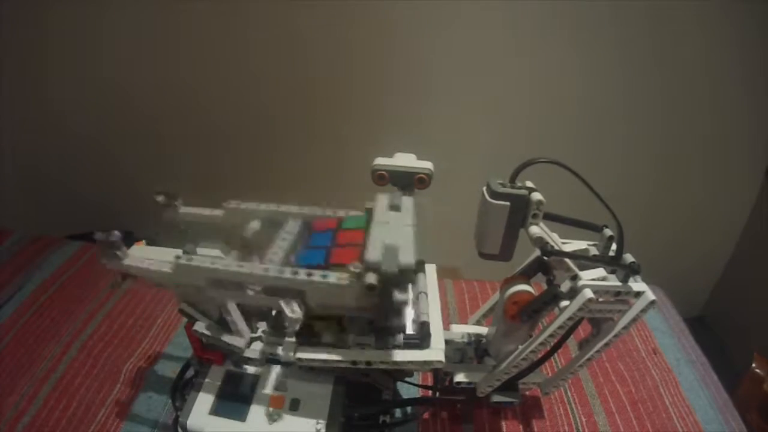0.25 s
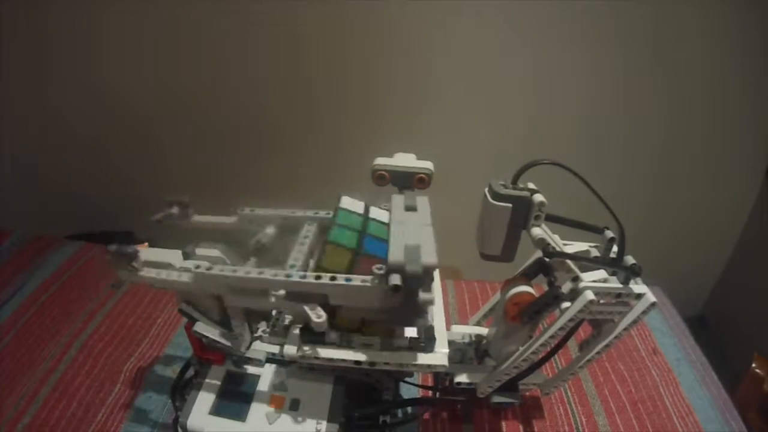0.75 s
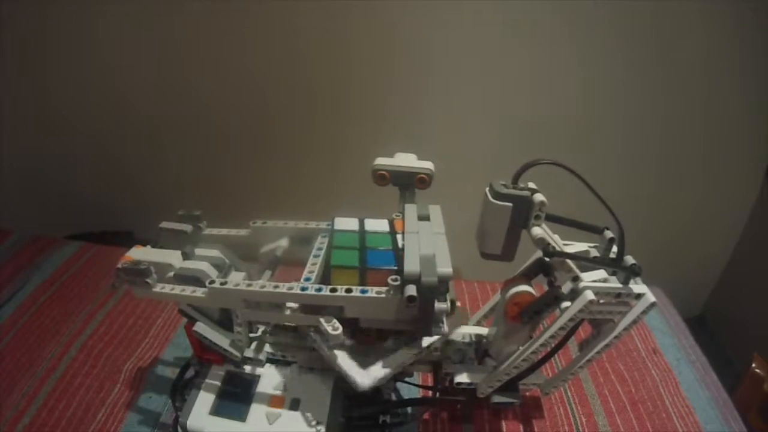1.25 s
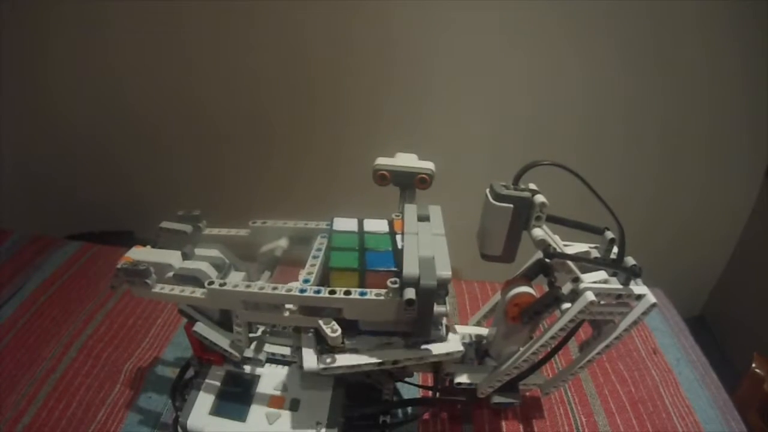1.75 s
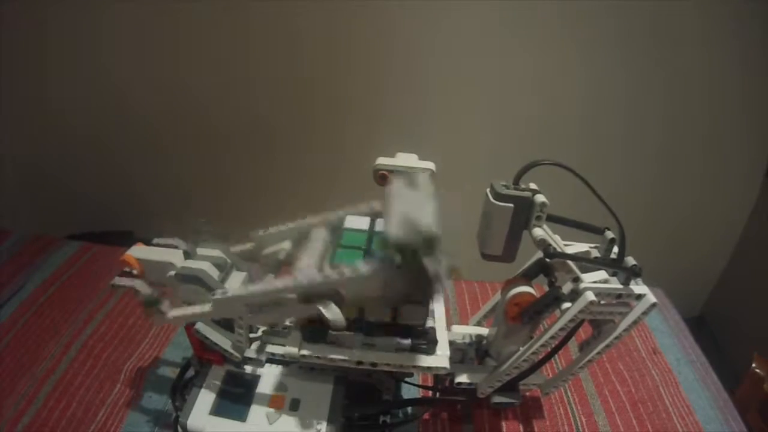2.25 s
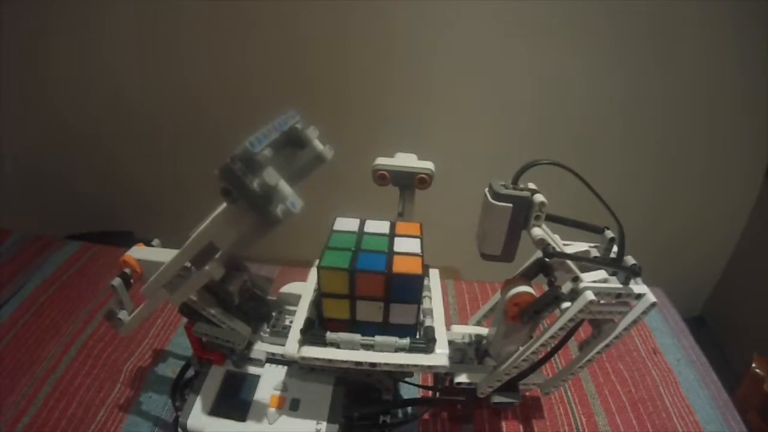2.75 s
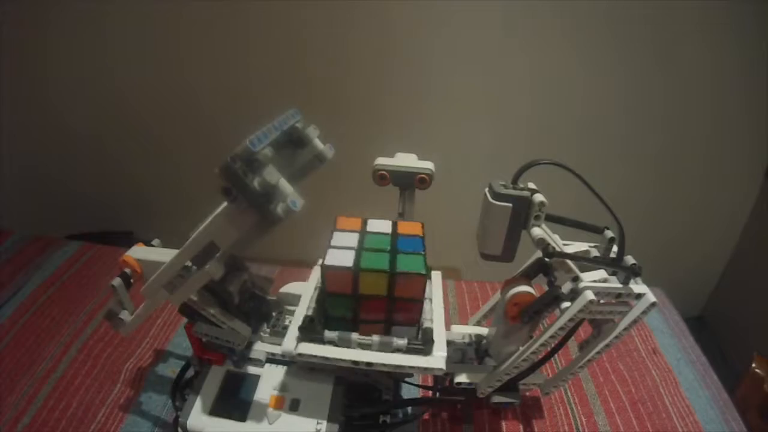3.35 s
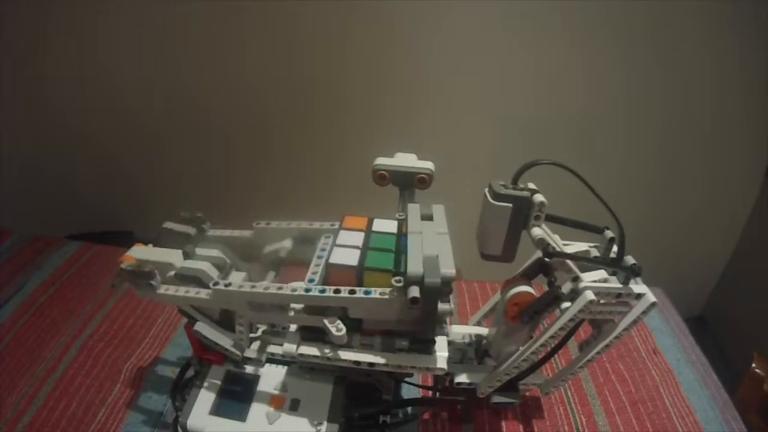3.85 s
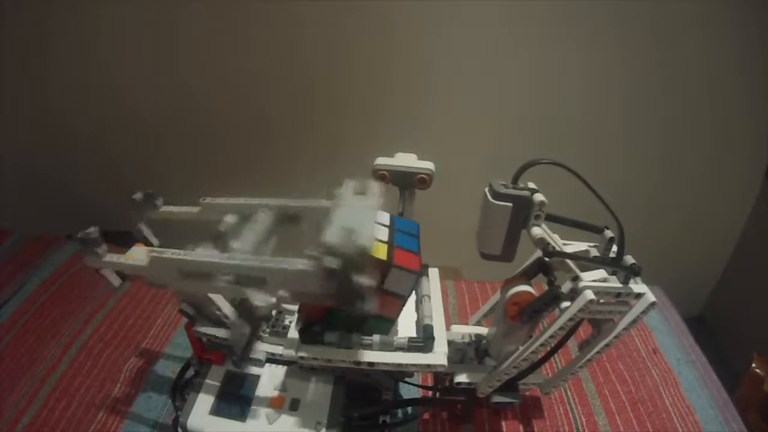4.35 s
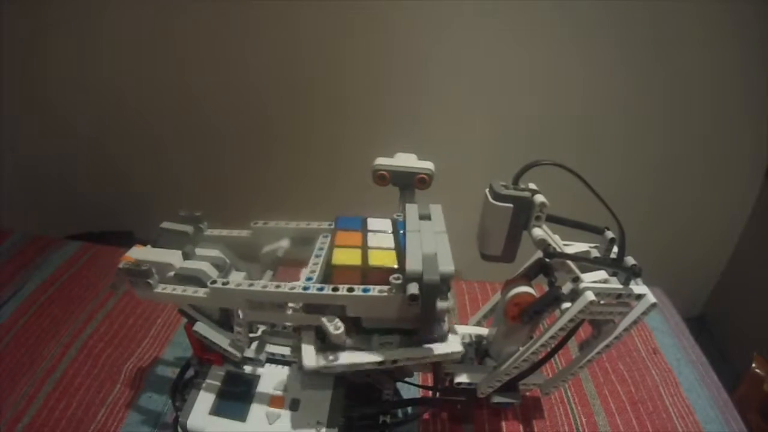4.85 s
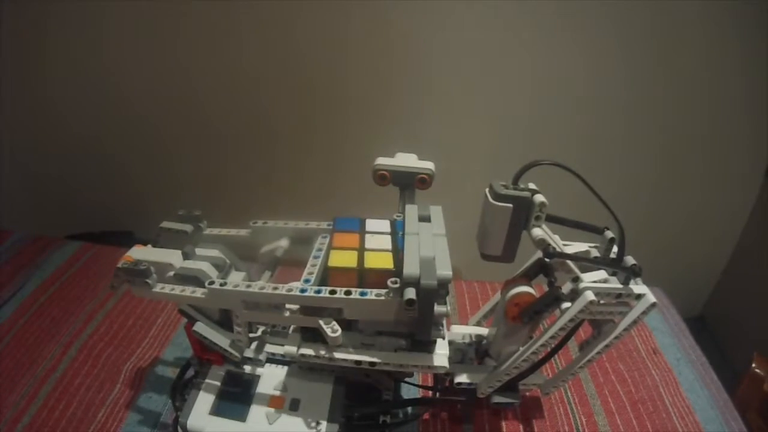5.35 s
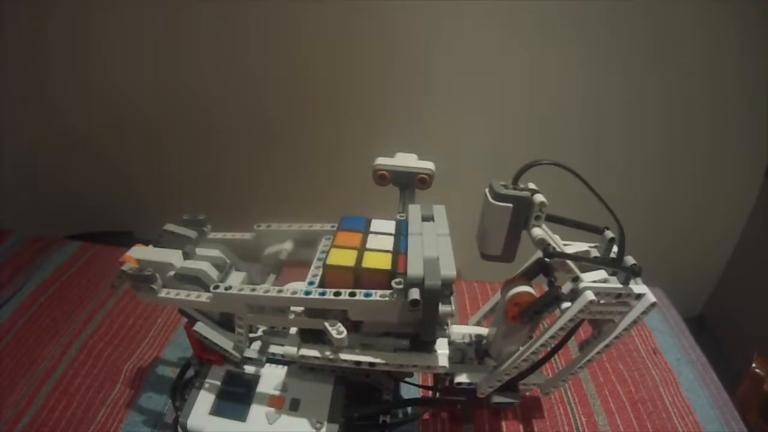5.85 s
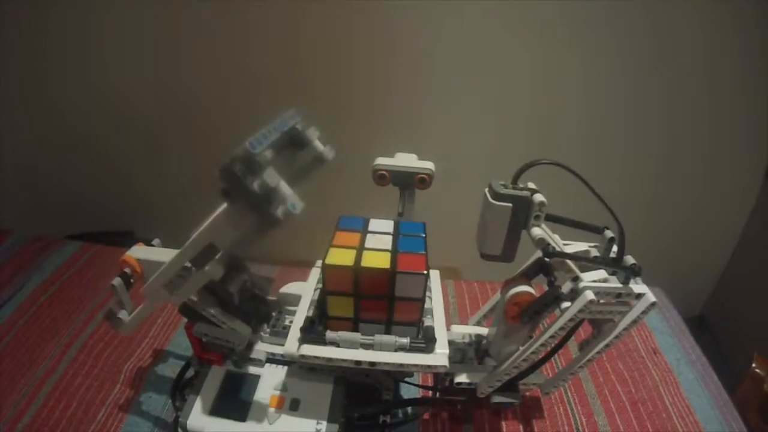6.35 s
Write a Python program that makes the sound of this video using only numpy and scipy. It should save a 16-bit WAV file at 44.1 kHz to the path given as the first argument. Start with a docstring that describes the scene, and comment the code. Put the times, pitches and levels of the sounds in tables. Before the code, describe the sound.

Stop-and-go servo whirring, hollow plastic clacks and dull frame thumps from a toy machine turning a puzzle cube, heard close indoors.

```python
"""A small room with a cloth-covered table: a toy robot of plastic beams flips and twists a puzzle cube.
Two geared servos (arm, turntable) rasp and whine: tooth harmonics and rattling grains through plastic modes.
The cube clacks against its cage and edges tick: damped sines and short noise bursts.
Drops thump the frame, which judders in its low modes, while the whole rig wobbles slowly on its support.
A short dense reverb holds motors and blows; a soft steady hiss lies underneath."""
import sys
import numpy as np
from scipy import signal
from scipy.fft import rfft, irfft
from scipy.io import wavfile

SR = 44100
rng = np.random.default_rng(int(sys.argv[2]) if len(sys.argv) > 2 else 0)


def store_pcm(level_fs):
    """Save levels as 16-bit WAV."""
    pcm = np.round(np.clip(level_fs, -1, 1) * 32767).astype(np.int16)
    wavfile.write(sys.argv[1], SR, np.atleast_2d(pcm).T)


N = 291501
TIME = np.arange(N) / SR  # s
FREQ = np.fft.rfftfreq(N, 1 / SR)  # Hz

ARM_RISE_S, ARM_T60_S, ARM_WAVER_DB = .028, .24, 1.2
# broad colour of the arm drive [f/Hz, level/dB]
ARM_COLOUR = [(100, -10), (900, -9), (1800, -2), (2900, -5), (3400, -2), (5400, 4.5), (6200, -6),
              (7800, -3), (9500, -14), (15000, -30)]
# resonances of the arm and its servo, on top of that colour [f/Hz, width/Hz, lift/dB]
ARM_BEAMS = [(1180, 160, 6.5), (1435, 290, 16), (2060, 330, 8.5), (2640, 120, 12), (3553, 95, 11),
             (3706, 216, 14), (4030, 130, 10), (4520, 110, 5.5), (5025, 250, 9.5), (6690, 920, 7.5),
             (11140, 1260, 12.5)]


def arm():
    """The arm servo never settles on a speed, so it mostly rasps; on hard strokes the cage scrapes the cube."""
    strokes = [(s, length, gear_db) for s, length, gear_db, *_ in arm_strokes()]
    effort = runs(strokes, ARM_RISE_S, ARM_T60_S) * undb(ARM_WAVER_DB * walk(25))
    force = effort / effort.max()
    tooth_hz = 760 * (force + 0.022) ** .13 * (1 + 0.06 * walk(12))
    drive = gears(tooth_hz, whine_db=-13.5, flutter=0.01243, rate=3000, scatter_db=0.0, chatter_db=3.0)
    rasp = unit(colour(drive, ARM_COLOUR, ARM_BEAMS), 3000, 9000)
    slips = grains(rate=1600, scatter_db=1.0) * undb(1.0 * walk(120))
    scrape = unit(band(slips, 3180, 4830))
    scrape_share = np.clip(0.3 * force, 0, .8)  # of the power
    return (np.sqrt(1 - scrape_share) * rasp + np.sqrt(scrape_share) * scrape) * effort


# servo strokes of each arm move [t/s into the move, length/s, gear level/dB, frame judder level/dB]
# flip: pull the cube back, tip it over, hold while it falls, take up the slack, shove it home, settle
FLIP_STROKES = [(0.0, .112, -51, -56), (0.162, .075, -50.5, -54), (0.27, .11, -65, -44),
                (0.445, .055, -56, -47), (0.522, .04, -48, -50), (0.6, .16, -60, -47)]
# lift: swing up, coast, brake, settle
LIFT_STROKES = [(0.0, .095, -52.5, -48), (0.105, .085, -57, -49), (0.232, .03, -54, -48),
                (0.303, .045, -59.5, -50.5)]
# lower: swing down, land on the cube, press it down, settle
LOWER_STROKES = [(0.0, .075, -50, -43), (0.152, .085, -56.5, -46), (0.288, .07, -57.5, -53),
                 (0.395, .03, -67, -74)]
# starts of each arm move [t/s, rocking level of the rig/dB]
FLIPS = [(0.221, -33), (3.95, -36.5)]
LIFTS = [(2.25, -38.5), (5.997, -39)]
LOWERINGS = [(-0.322, -38.5), (3.43, -33.5), (6.568, -45)]


def arm_strokes():
    """Every stroke of every arm move: (t/s, length/s, gear level/dB, judder level/dB, rocking level/dB)."""
    strokes = []
    for starts, pattern in [(FLIPS, FLIP_STROKES), (LIFTS, LIFT_STROKES), (LOWERINGS, LOWER_STROKES)]:
        for s, rock_db in starts:
            for offset, length, gear_db, judder_db in pattern:
                strokes.append((s + offset, length, gear_db, judder_db, rock_db))
    return strokes


# turntable twists a layer of the held cube, then backs off
# [t/s, length/s, gear level/dB, frame judder level/dB, rocking level/dB, target tooth rate f/Hz before hunting]
TWISTS = [(1.121, .425, -52.5, -49.5, -40.5, 923.5), (1.71, 0.086, -50.5, -52.5, -41, 848),
          (4.847, .435, -52.5, -52, -44, 918), (5.45, 0.089, -52, -52.5, -40, 846)]
# broad colour of the loaded turntable drive [f/Hz, level/dB]
TWIST_COLOUR = [(100, -3), (600, -8), (1000, -3.5), (1400, -1.5), (1850, 3.5), (2500, 2.5), (3100, -6),
                (4300, -2), (5600, -1), (7500, -4), (9500, -13), (12000, -15.5), (15000, -32)]
# resonances of the turntable and its servo, loaded or free [f/Hz, width/Hz, lift/dB]
CASE = [(1190, 53, 10.5), (1408, 270, 19), (2440, 340, 4.5), (2764, 170, 4.5), (3535, 44, 9),
        (3728, 175, 10.5), (3963, 310, 12.5), (5040, 190, 15.5), (6750, 330, 9), (7910, 180, 8.5),
        (8500, 460, -1)]


def twist():
    """Under the cube's load the teeth stay pressed together and sing, over the growl of the slower stage."""
    tooth_hz, gain = turntable(TWISTS)
    drive = gears(tooth_hz, whine_db=-5, flutter=0.0119, rate=6000, scatter_db=3.5, chatter_db=-0.5)
    song = unit(colour(drive, TWIST_COLOUR, CASE), 2000, 9000)
    growl = slow_stage(tooth_hz, flutter=.1, overtone_db=-25)
    return (song + undb(4.5) * growl) * gain


# turntable runs free, in small nudges and one quarter turn
# [t/s, length/s, gear level/dB, frame judder level/dB, rocking level/dB, target tooth rate f/Hz before hunting]
SPINS = [(2.0, 0.072, -57.5, -47.5, -52, 700), (2.144, 0.029, -56, -66, -41.5, 650),
         (2.832, .425, -55.5, -59, -50.5, 953), (3.29, 0.066, -66.5, -58, -56, 650),
         (5.726, 0.087, -59, -51.5, -42.5, 690), (5.884, 0.031, -57.5, -59, -44, 650)]
# broad colour of the free turntable drive [f/Hz, level/dB]
SPIN_COLOUR = [(100, -28), (460, 9.5), (650, -18), (1100, -14), (1850, -1.5), (2500, 0), (3100, -9.5),
               (4300, -4.5), (5800, -3.5), (7500, -10.5), (10000, -16), (12000, -19), (15000, -29)]


def spin():
    """Unloaded, the gears rattle, and the slower stage hums loudest on the way to and from top speed."""
    tooth_hz, gain = turntable(SPINS)
    drive = gears(tooth_hz, whine_db=-17.0, flutter=0.0272, rate=3800, scatter_db=1, chatter_db=-1.0)
    free_case = CASE + [(1450, 150, 3), (4000, 220, 3)]
    rasp = unit(colour(drive, SPIN_COLOUR, free_case), 2000, 9000)
    torque = np.interp(tooth_hz, [687, 778, 893, 917], [0.13, 0.93, 0.89, 0.42])
    hum = slow_stage(tooth_hz, flutter=0.0407, overtone_db=-25)
    return (rasp + undb(13.5) * torque * hum) * gain


TABLE_RISE_S, TABLE_T60_S = 0.03, 0.14
START_HZ, RUN_UP_S, COAST_S = 470.2, .075, .14  # resting tooth rate; how fast the turntable gains and loses speed
HUNT_HZ, HUNT_DEPTH, HUNT_ONSET_S, HUNT_DB = 17.4, 0.029, 0.263, -1  # speed control swings about its set speed


def turntable(moves):
    """Tooth rate and gain of the turntable servo: it runs up, hunts about its speed and coasts down."""
    tooth_hz, swing = np.full(N, START_HZ), np.zeros(N)
    for s, length, *_, top_hz in moves:
        since = TIME >= s
        t = TIME[since] - s
        coast = np.exp(-(np.maximum(t - length, 0) / COAST_S) ** 2)
        hunt_growth = np.minimum(t / HUNT_ONSET_S, 1) ** 2
        swing[since] = -np.sin(2 * np.pi * HUNT_HZ * t) * hunt_growth * coast
        tooth_hz[since] = START_HZ + (top_hz - START_HZ) * (1 - np.exp(-t / RUN_UP_S)) * coast ** 2
    gain = runs([(s, length, db) for s, length, db, *_ in moves], TABLE_RISE_S, TABLE_T60_S)
    return tooth_hz * (1 + HUNT_DEPTH * swing), gain * undb(HUNT_DB * swing)


def gears(tooth_hz, whine_db, flutter, rate, scatter_db, chatter_db):
    """Whine plus backlash: teeth sing while pressed together at speed, and rattle in uneven bursts."""
    tone, phase = whine(tooth_hz, flutter)
    rattle = grains(rate, scatter_db) * (1 + .5 * np.cos(phase)) * undb(chatter_db * walk(29))
    engaged = np.interp(tooth_hz, [640, 780], [.15, 1])
    # the load eases many times a second and the tone breaks up
    pressed = np.clip(1 + .5 * walk(45), .2, 1.35)
    return unit(rattle) + undb(whine_db) * engaged * pressed * tone


# harmonics of the tooth rate [multiple, relative level/dB]
MESH = [(1, -4.5), (2, -0.5), (3, 0), (4, -6.5), (5, -3.5), (6, -15), (7, -4.5), (8, -7), (9, -6.5)]


def whine(tooth_hz, flutter):
    """Harmonics of meshing teeth; play in the gears shakes their pitch and strength."""
    phase = 2 * np.pi * np.cumsum(tooth_hz * (1 + flutter * walk(103.6))) / SR
    harmonics = sum(undb(db + 3.5 * walk(35)) * np.sin(k * phase) for k, db in MESH)
    return unit(harmonics), phase


# modes of the frame on the table; slow gear stage, thumps and judder all excite them [f/Hz, width/Hz, level/dB]
FRAME = [(96.5, 46, 1), (153, 25, -7.5), (216.4, 19, 2.5), (254.9, 15.7, 2), (285, 2.2, -7.5),
         (334.5, 15, 2.5)]


def slow_stage(tooth_hz, flutter, overtone_db):
    """A slower gear stage hums unevenly as it sweeps through the frame's modes."""
    phase = 2 * np.pi * np.cumsum(.31 * tooth_hz * (1 + flutter * walk(41.0))) / SR
    overtone = np.sin(2 * phase + 2 * walk(37.0))
    hum = ring(np.sin(phase), FRAME) + undb(overtone_db) * overtone
    return hum * undb(2.7 * walk(32))


# cube and cage clack together [t/s, body peak level/dB before cage and mix, ring f/Hz, contact time/s]
CLACKS = [(0.313, -36.5, 1334, 0.0012), (0.529, -42.5, 1380, 0.001), (0.579, -44.5, 1370, 0.0016),
          (0.707, -45, 1330, 0.00096), (0.7466, -46, 1300, 0.0012), (0.814, -45, 1370, 0.0025),
          (0.9334, -39.5, 1324, 0.0015), (0.9722, -41, 1260, 0.001), (1.214, -40, 1250, 0.0015),
          (1.253, -45.5, 1406, 0.0033), (1.4218, -44, 1220, 0.0022), (1.7493, -45.5, 1320, 0.0016),
          (1.7954, -52, 1410, 0.0054), (2.264, -54, 1500, 0.002), (2.363, -45.5, 1290, 0.0011),
          (3.244, -49, 1520, 0.0019), (3.5913, -42, 1436, 0.0023), (3.638, -38.5, 1370, 0.0019),
          (4.0416, -34, 1320, 0.00092), (4.2705, -41.5, 1280, 0.0012), (4.3205, -42, 1410, 0.00065),
          (4.4416, -44.5, 1310, 0.0019), (4.4864, -43.5, 1240, 0.0021), (4.5588, -46.5, 1400, 0.0033),
          (4.6717, -38.5, 1300, 0.0012), (4.7138, -43, 1370, 0.0024), (4.9493, -41.5, 1316, 0.002),
          (5.1543, -40, 1237, 0.0023), (5.2008, -37.5, 1344, 0.0018), (6.0288, -41.5, 1403, 0.0015)]
# modes of the cage around the cube [f/Hz, width/Hz, level/dB]
CAGE = [(1247, 28, 10), (1326, 100, 0.5), (1479, 54, 7), (1520, 41, -2), (2010, 47, -4), (2590, 64, 6)]


def clacks():
    """A few cycles of damped plastic, a dry crack and small bounces; glancing blows last longer."""
    out, t = np.zeros(N), TIME[:SR // 6]
    gaps = rng.uniform(0.0073, 0.024, (len(CLACKS), 3))  # s between bounces
    for (s, db, hz, contact_s), gap in zip(CLACKS, gaps):
        body = np.sin(2 * np.pi * hz * t) * blow(t, contact_s, 6 * contact_s)
        crack = rng.standard_normal(len(t)) * blow(t, rise_s=.0005, t60=0.074)
        clack = undb(db) * (body / np.abs(body).max() + undb(-9) * crack)
        add(out, s, clack)
        for k, delay in enumerate(np.cumsum(gap)):
            add(out, s + delay, undb(-16.5 - 22.0 * k) * clack)
    return band(out + ring(out, CAGE), 1370, 5600)


# cube drops and end stops thump the frame [t/s, bend peak level/dB before frame and mix, ring f/Hz]
THUMPS = [(0.009, -39, 219), (0.321, -34, 218), (0.469, -39, 194), (0.535, -31.5, 253), (0.58, -30, 220),
          (0.707, -39, 215), (0.871, -42.5, 224), (0.975, -35, 200), (1.219, -34.5, 221), (1.473, -39, 224),
          (2.362, -44, 235), (2.411, -39, 269), (2.608, -34.5, 190), (3.174, -36.5, 246.3),
          (3.245, -28.5, 221.5), (3.734, -36, 216), (4.044, -39.5, 264), (4.272, -27.5, 228),
          (4.318, -45, 223), (4.69, -33, 221), (4.967, -37, 218), (5.158, -34.5, 222), (5.212, -34.5, 217),
          (6.085, -51, 215.6), (6.147, -44, 255.2)]


def thumps():
    """Heavy blows bend the frame, with a weak overtone, and leave its low modes ringing."""
    out, t = np.zeros(N), TIME[:SR // 4]
    lowest_hz = FRAME[0][0]
    sag = np.sin(2 * np.pi * lowest_hz * t) * blow(t, rise_s=.005, t60=.12)
    for s, db, hz in THUMPS:
        phase = 2 * np.pi * hz * t
        bend = (np.sin(phase) + undb(-28.5) * np.sin(2 * phase)) * blow(t, rise_s=0.0067, t60=0.036)
        add(out, s, undb(db) * (bend / np.abs(bend).max() + undb(-2.0) * sag))
    return out + undb(-3.5) * ring(out, FRAME)


# sharp edges snap past each other [t/s, noise level/dB before colour and mix]
TICKS = [(0.313, -44), (0.5302, -51), (0.5756, -52), (0.7507, -40.5), (0.972, -43), (2.5055, -44.5),
         (3.242, -39), (3.6, -43.5), (4.2677, -50), (4.3166, -48.5), (4.486, -40.5), (4.5584, -50),
         (4.659, -50), (4.7166, -42.5), (6.24, -46)]


def ticks():
    """Bright little snaps of plastic edges: a hard first click and a short chatter."""
    out, t = np.zeros(N), TIME[:SR // 12]
    for s, db in TICKS:
        click, chatter = blow(t, rise_s=0.000079, t60=0.0066), blow(t, rise_s=0.0013, t60=0.052)
        add(out, s, undb(db) * rng.standard_normal(len(t)) * (click + undb(-2.5) * chatter))
    slope = [(500, -6), (2500, -3.5), (7000, -4.5), (8700, -5.0), (11200, -23.5), (13000, -9), (15000, -38)]
    return colour(out, slope, ARM_BEAMS)


def judder(gain):
    """Many small jolts keep the frame's low modes rumbling."""
    jolts = ring(grains(rate=500, scatter_db=4.5), FRAME)
    slope = [(50, -24), (100, 10.5), (290, 2.5), (370, -24.5), (480, -7.5), (700, -27), (2000, -35)]
    return unit(colour(jolts, slope)) * gain


def wobble(gain):
    """The rig rocks at its two lowest resonances, which wander a little and beat against each other."""
    def sway(hz):
        """One resonance, its pitch drifting by chance."""
        return np.sin(2 * np.pi * np.cumsum(hz + 2.447 * walk(5.82)) / SR)
    rocking = sway(hz=45.47) + undb(-11.5) * sway(hz=40.2)
    return np.sqrt(2) * rocking * gain * undb(2.3 * walk(35))


ROCK_LAG_S, ROCK_RISE_S, ROCK_T60_S = 0.077, 0.028, 0.86  # the heavy rig follows each stroke late
JUDDER_LAG_S, JUDDER_RISE_S, JUDDER_T60_S = 0.025, 0.012, 0.34  # the frame takes up each stroke and shakes on
JUDDER_REST_DB, JUDDER_FLUTTER_DB = -65, 1.5
THUMP_JUDDER_DB, THUMP_ROCK_DB, THUMP_HOLD_S = -10.5, -7, 0.014  # what a thump leaves in frame and rig


def shaking():
    """Gains of the frame's judder and the rig's rocking: every stroke and every thump feeds both."""
    motion = arm_strokes() + TWISTS + SPINS
    jolts = [(s + JUDDER_LAG_S, length, db) for s, length, _, db, *_ in motion]
    jolts += [(s, THUMP_HOLD_S, db + THUMP_JUDDER_DB) for s, db, _ in THUMPS]
    sways = [(s + ROCK_LAG_S, length, db) for s, length, _, _, db, *_ in motion]
    sways += [(s, ROCK_LAG_S + THUMP_HOLD_S, db + THUMP_ROCK_DB) for s, db, _ in THUMPS]
    shake = np.hypot(runs(jolts, JUDDER_RISE_S, JUDDER_T60_S), undb(JUDDER_REST_DB))
    rock = runs(sways, ROCK_RISE_S, ROCK_T60_S)
    return shake * undb(JUDDER_FLUTTER_DB * walk(42)), rock


def room(x, t60, wet_db):
    """Close walls give a short, dense tail."""
    t = TIME[:SR // 2]
    tail = band(rng.standard_normal(len(t)), 450, 11200) * blow(t, rise_s=0.0051, t60=t60)
    return x + undb(wet_db) * signal.fftconvolve(x, tail / np.linalg.norm(tail))[:N]


# colour of the still room [f/Hz, relative level/dB]
ROOM_TONE = [(40, -12.5), (200, -28.5), (440, -33.5), (750, -36.5), (1900, -40), (3050, -42), (4600, -45.5),
             (9000, -52.5), (15000, -61)]


def hiss():
    """Soft steady noise of the still room, scaled to rms 1 between 600 and 950 Hz."""
    return unit(colour(rng.standard_normal(N), ROOM_TONE), 600, 950)


def undb(db):
    """Decibels to gain."""
    return 10 ** (np.asarray(db) / 20)


def band(x, lo, hi):
    """Gentle band-pass between two frequencies in Hz."""
    return signal.sosfilt(signal.butter(2, [lo, hi], "band", fs=SR, output="sos"), x)


def unit(x, lo=20, hi=20000):
    """Scale to rms 1 within a band in Hz."""
    inside = (FREQ > lo) & (FREQ < hi)
    power = 2 * np.sum(np.abs(rfft(x)[inside]) ** 2) / N ** 2
    return x / np.sqrt(power)


def walk(rate):
    """Smooth chance with a spread of 1; its motion fades out above rate in Hz."""
    slow = irfft(rfft(rng.standard_normal(N)) / (1 + (FREQ / rate) ** 4), N)
    return slow / slow.std()


def colour(x, points, peaks=()):
    """Causal filter from a broad (Hz, dB) slope and resonances that ring on top of it."""
    hz, db = np.transpose(points)
    gain_db = np.interp(np.log(FREQ + 1), np.log(hz), db)
    for centre, width, lift in peaks:
        gain_db = gain_db + lift / (1 + ((FREQ - centre) / width) ** 2 * 2) ** 2
    # fold the cepstrum forward in time for minimum phase
    cepstrum = irfft(np.log(undb(gain_db)), N)
    cepstrum[1:N // 2] *= 2
    cepstrum[N // 2:] = 0
    return irfft(rfft(x) * np.exp(rfft(cepstrum)), N)


def ring(x, modes):
    """Drive a set of (Hz, width Hz, dB) modes as parallel resonators."""
    return sum(undb(db) * signal.lfilter(*signal.iirpeak(hz, hz / width, fs=SR), x) for hz, width, db in modes)


def grains(rate, scatter_db):
    """Tiny impacts of unequal size, on average rate per second."""
    struck = rng.random(N) < rate / SR
    sign = np.sign(rng.standard_normal(N))
    return struck * sign * undb(scatter_db * np.clip(rng.standard_normal(N), -2, 2))


def blow(t, rise_s, t60):
    """Envelope of a contact that builds up briefly and dies away."""
    return (1 - np.exp(-(t / rise_s) ** 2)) * undb(-60 * t / t60)


def runs(rows, rise_s, t60):
    """Gain of (t/s, length/s, level/dB) runs that build up, hold and die away; overlaps add in power."""
    power = np.zeros(N)
    for s, length, db in rows:
        near = slice(*np.searchsorted(TIME, [s, s + length + 2 * t60]))
        t = TIME[near] - s
        fall_db = -60 * np.maximum(t - length, 0) / t60
        power[near] += (undb(db + fall_db) * (1 - np.exp(-(t / rise_s) ** 2))) ** 2
    return np.sqrt(power)


def add(track, s, sound):
    """Mix a short sound in at time s."""
    start = max(int(s * SR), 0)
    track[start:start + len(sound)] += sound[:N - start]


def scene():
    """Motors and blows in the room, with judder and wobble dry, over a soft steady hiss."""
    shake, rock = shaking()
    motors = undb(-1.5) * arm() + undb(-1.5) * twist() + undb(-0.5) * spin()
    blows = undb(1.0) * clacks() + undb(-1.0) * thumps() + undb(-0.5) * ticks()
    frame = undb(0.5) * judder(shake) + undb(-1.0) * wobble(rock)
    robot = room(motors + blows, t60=0.43, wet_db=-9.0) + frame
    return (robot + undb(-71.0) * hiss())[None]


def record(dry):
    """A high-pass drops the deepest bass and a steep low-pass cuts the top."""
    lean = signal.sosfilt(signal.butter(3, 24, "high", fs=SR, output="sos"), dry)
    return signal.sosfilt(signal.ellip(10, .2, 80, 15200, fs=SR, output="sos"), lean)


dry = scene()
out = record(dry)
store_pcm(out)
```